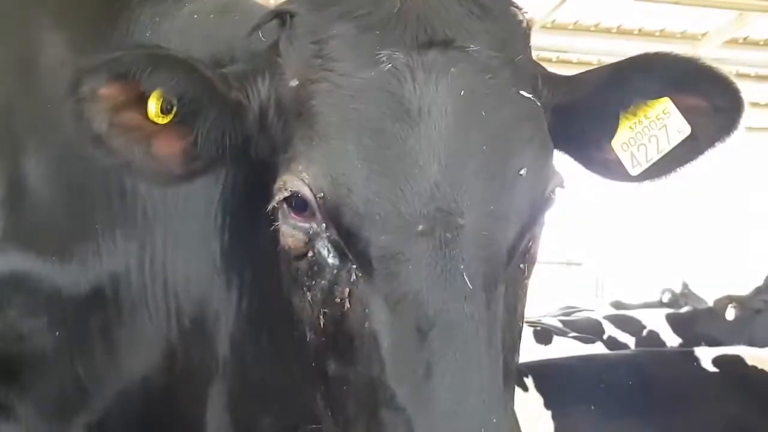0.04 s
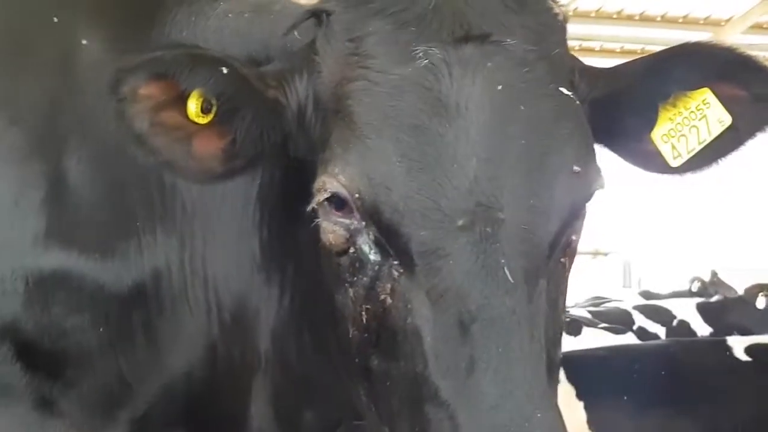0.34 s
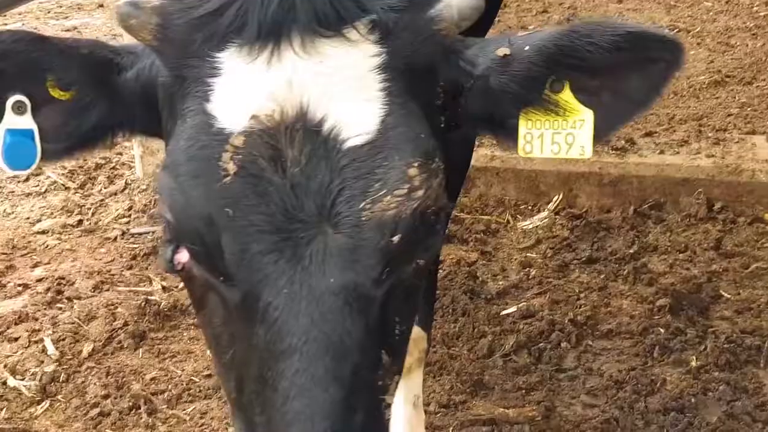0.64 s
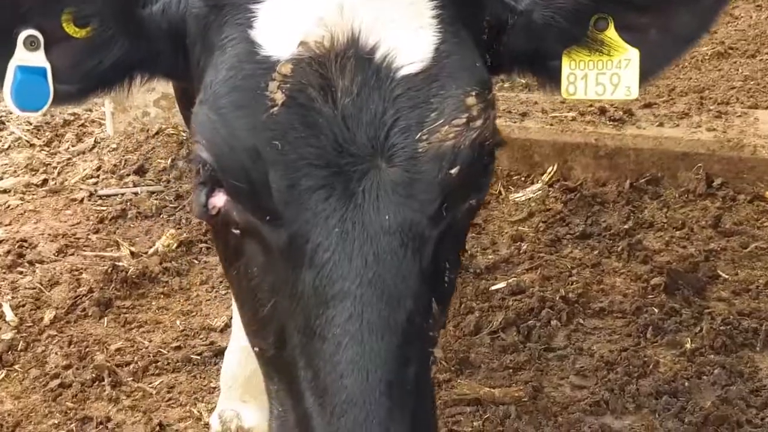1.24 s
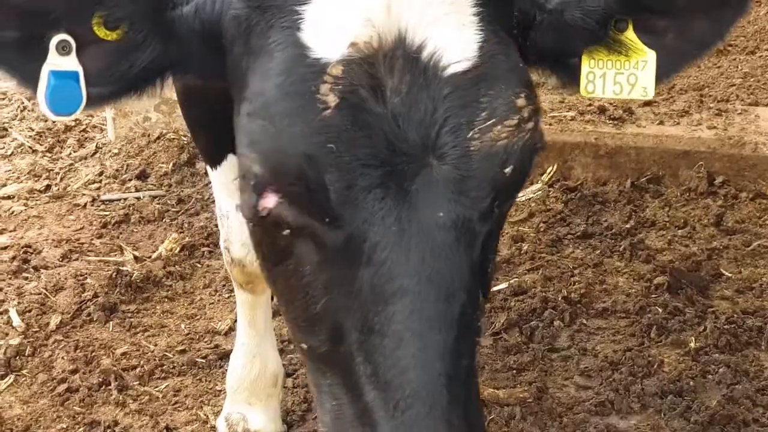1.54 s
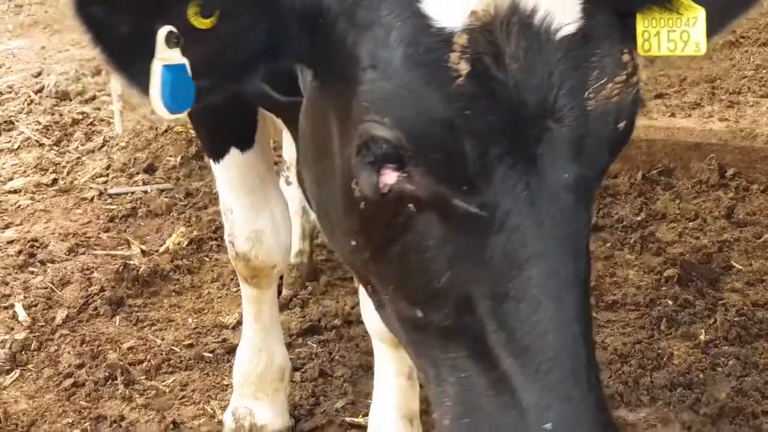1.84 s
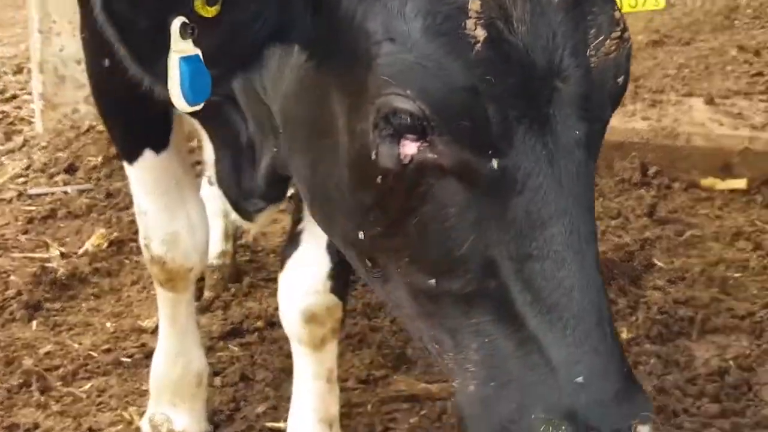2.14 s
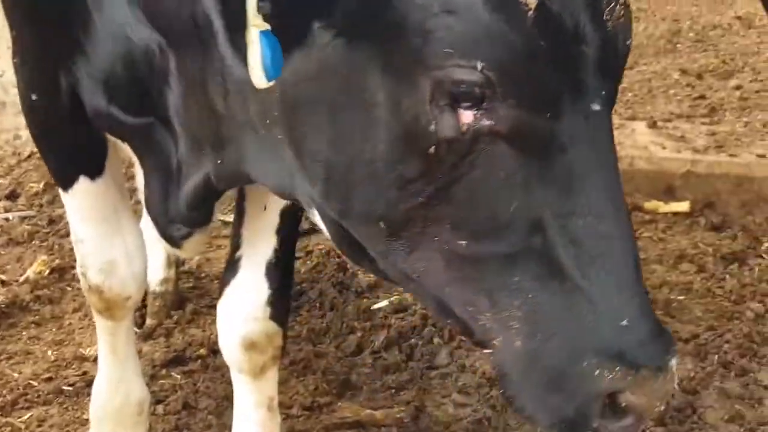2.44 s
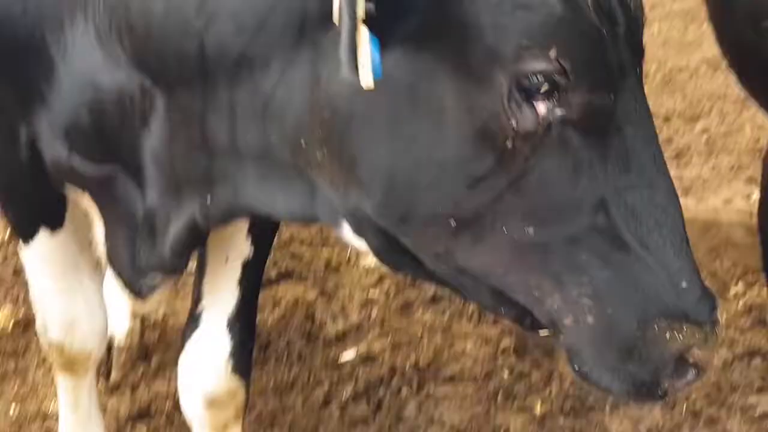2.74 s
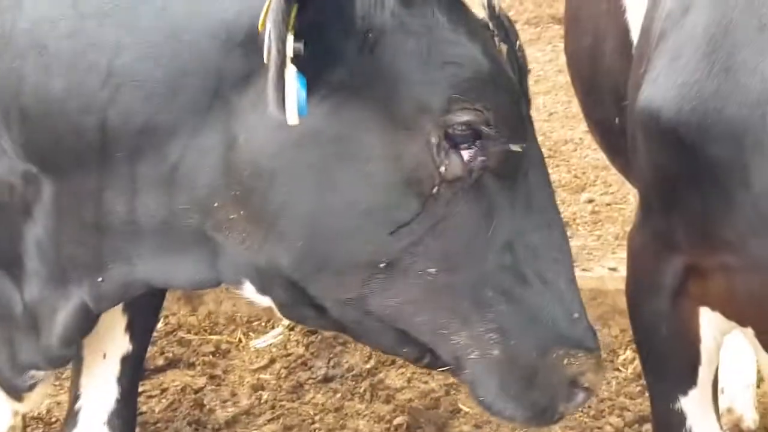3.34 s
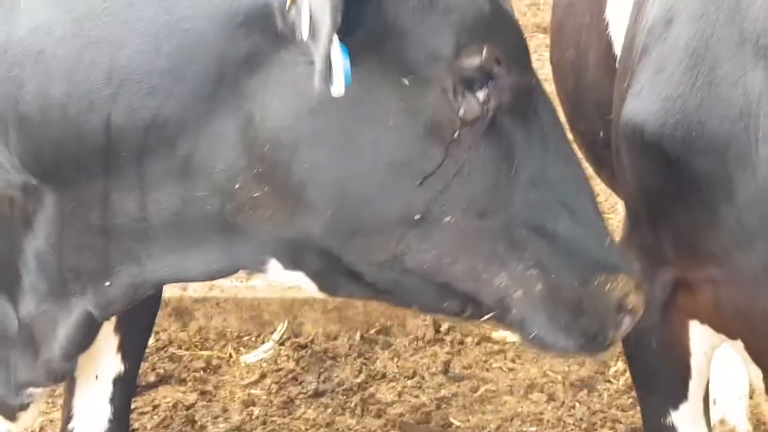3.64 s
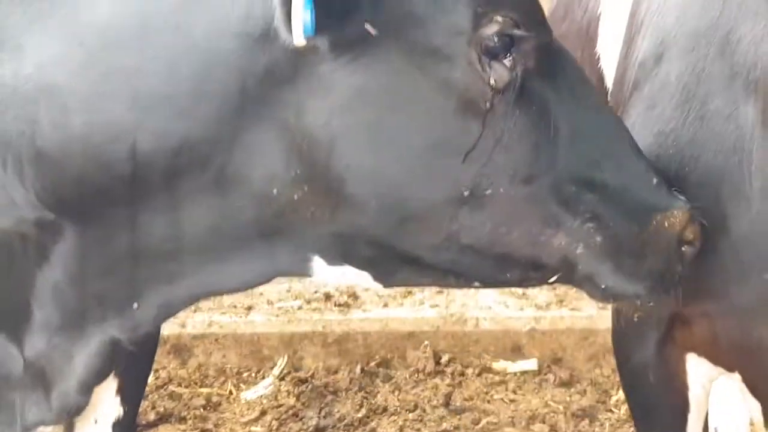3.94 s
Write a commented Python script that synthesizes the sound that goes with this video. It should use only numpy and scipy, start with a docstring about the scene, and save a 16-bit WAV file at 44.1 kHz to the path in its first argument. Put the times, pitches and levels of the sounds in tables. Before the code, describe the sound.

A steady, low machine drone dominates. First, big fans rumble briefly in a dairy barn; then a tick and an abrupt switch bring the droning pump outdoors, with light rushing air, thin whine, faint cattle scuffs and far-off birds.

```python
"""A rumbling rush of air from big fans in a dairy barn, then a cut, with a small click, to the open yard.
There a pump (likely the milking vacuum pump) drones on two low notes, over mains hum and the thin
whine of a motor drive. Outdoor air rushes and a fine hiss sputters on the left. Cattle shift faintly,
small birds chirp far off, and a cow seems to start lowing at the end.
Air, hiss and scuffs are shaped noise; machine tones, chirps and the cow's note are wavering sines."""
import sys
import numpy as np
from scipy import signal
from scipy.fft import rfft, irfft
from scipy.io import wavfile
from scipy.ndimage import uniform_filter1d

SR = 44100
rng = np.random.default_rng(int(sys.argv[2]) if len(sys.argv) > 2 else 0)


def master(y):
    """Save y as 16-bit WAV."""
    cut = np.clip(np.atleast_2d(y).T, -1, 1)
    pcm = np.round(cut * 32767)  # scale
    wavfile.write(sys.argv[1], SR, pcm.astype(np.int16))


N = 176400
TIME_S = np.arange(N) / SR

# Yard air spectrum. Each row: frequency in Hz, relative density in dB.
YARD_SPECTRUM = [(20, -33), (50, -1), (90, -1), (135, 1), (180, -4.5), (330, -9.5), (520, -14.5),
                 (740, -14.5), (1100, -18), (2200, -20.5), (2950, -25.5), (3750, -25), (4020, -23),
                 (4300, -26), (5200, -32.5), (7000, -35), (8500, -40), (12000, -35.5), (15800, -39)]
# Yard air stereo likeness. Each row: frequency in Hz, L/R correlation.
YARD_CORRELATION = [(100, .96), (290, 0.9), (640, 0.0017), (1200, -0.42), (2100, 0.23), (3500, -0.12),
                    (12000, 0.13)]
# Yard air balance. Each row: frequency in Hz, L-R in dB.
YARD_LEAN_DB = [(100, 11.5), (300, -1), (650, 3), (1200, 0.5), (4000, -1), (7000, 0.5), (10000, 3)]
# Yard air swell. Each row: time in seconds, gain in dB.
YARD_SWELL_DB = [(.64, 0), (1.2, -0.9), (2.2, -0.36), (2.7, 0.1), (3.3, 0), (3.9, 0.7)]

# Bird calls. Each row: start and length in seconds, start and end pitch in Hz, peak level in dB.
BIRD_CHIRPS = [(0.558, 0.073, 3830, 3860, -51.5), (0.906, 0.079, 6400, 6430, -59),
               (1.468, 0.057, 5560, 5850, -49.5), (1.585, 0.038, 5400, 5540, -60),
               (3.469, 0.059, 4700, 4550, -53), (3.765, 0.066, 6750, 6700, -56.5),
               (3.783, 0.036, 5300, 5530, -58)]
# Scuffs and bumps. Each row: start and length in seconds, centre in Hz, peak level in dB, L-R in dB.
CATTLE_SCUFFS = [(0.011, 0.089, 61, -30.5, 4), (0.107, 0.13, 480, -39, -3), (0.48, 0.016, 167, -23, -2),
                 (.54, 0.16, 3800, -46.5, -4), (0.537, 0.2, 970, -46, 8), (2.648, 0.066, 243, -38, 5),
                 (3.533, 0.048, 676, -46, 4)]

# Lower hiss band. Each row: frequency in Hz, relative density in dB.
LOW_HISS_SPECTRUM = [(6500, -33), (8400, -6), (9200, -0.5), (10100, -0.5), (10750, 0), (11400, -3),
                     (13000, -23)]
# Lower band envelope. Each row: time in seconds, base level on the left in dB.
LOW_HISS_DB = [(.64, -56), (.95, -60.5), (1.15, -58), (1.95, -57.5), (2.4, -55), (2.85, -56.5), (3.4, -54),
               (3.6, -60), (3.75, -53.5), (4, -52.5)]
# Upper hiss band. Each row: frequency in Hz, relative density in dB.
HIGH_HISS_SPECTRUM = [(9500, -23), (11200, -19), (12400, 1.5), (14500, -2), (15800, 0.5)]
# Upper band envelope. Each row: time in seconds, base level on the left in dB.
HIGH_HISS_DB = [(.64, -54), (.95, -55), (1.3, -52), (1.8, -49.5), (2.3, -52), (2.85, -50), (3.55, -53),
                (3.8, -49), (4, -52)]
# Swells of the lower band. Each row: start and length in seconds, boost in dB.
HISS_RUSTLES = [(2.48, 0.14, 3.8), (2.69, 0.23, 3.2), (2.93, .18, 2.7), (3.2, 0.11, 2.8), (3.33, 0.11, 2.2),
                (3.7, 0.078, 4)]
# Spurts in both bands. Each row: start in seconds, boost in dB.
HISS_SPURTS = [(1.14, 4), (1.277, 4), (1.352, 6), (1.45, 4), (1.715, 5.3), (1.763, 6.1), (2.033, 5),
               (2.715, 3), (2.785, 4), (2.832, 4.5), (3.059, 5)]

# Cow's voice. Each row: harmonic number, level in dB.
MOO_HARMONICS = [(1, -45), (2, -39), (3, -44), (4, -43), (7, -51), (9, -53)]
# Breath in the call. Each row: frequency in Hz, relative density in dB.
MOO_RASP_SPECTRUM = [(60, -12), (200, -2), (400, 0), (800, -6), (1200, -15), (2200, -18), (5000, -36)]

# Motor whine. Each row: multiple of the shaft rate, level before fading in dB, L-R in dB.
MOTOR_ORDERS = [(6, -55, 2), (9, -58, 2), (18, -62, 3), (24, -62, -5), (30, -64, -1), (32, -64, -2)]
# Other machine tones. Each row: frequency in Hz, level before fading in dB, L-R in dB.
MACHINE_WHINES = [(373, -58, 3), (459, -60, 2), (609, -62, 0), (872, -64, -2), (909, -65, 1),
                  (2296, -71, 0)]
# Switching whine of the drive. Each row: sideband number, level before fading in dB.
DRIVE_SIDEBANDS = [(-2, -66.5), (-1, -68.5), (0, -71.5), (1, -67), (2, -68)]

# Fan rush spectrum. Each row: frequency in Hz, relative density in dB.
FAN_SPECTRUM = [(20, -21), (33, -10), (60, 3), (85, 1.5), (110, 3.5), (150, -1), (280, -5), (340, -3),
                (450, -9), (800, -12.5), (1250, -17), (2200, -20), (3900, -24), (6500, -34.5),
                (9800, -42.5), (11500, -37.5), (15800, -45)]
# Fan rush swell. Each row: time in seconds, gain in dB.
FAN_SWELL_DB = [(0, 0), (.08, 1.7), (.17, 2.1), (.27, 0), (.48, 0.8), (.6, 1.5)]
# Barn stereo likeness. Each row: frequency in Hz, L/R correlation.
BARN_CORRELATION = [(100, 0.98), (300, 0.9), (600, 0.42), (1100, -0.45), (2000, 0.17), (4000, -0.038),
                    (12000, .15)]
# Barn balance. Each row: frequency in Hz, L-R in dB.
BARN_LEAN_DB = [(200, 1.1), (800, 1.5), (2000, -.5), (4500, -4), (9000, 0)]
# Fan blade and motor tones. Each row: frequency in Hz, level before fading in dB.
FAN_WHINES = [(75, -42), (161, -42), (235, -45), (333, -43), (480, -53), (640, -55), (1068, -55),
              (1283, -61), (3932, -65)]

# Pump drone. Each row: harmonic number, level at the cut in dB, L-R in dB, left lead in radians.
PUMP_HARMONICS = [(1, -28, 3, .13), (2, -19.5, 2.5, 0.38), (4, -57, -5, 0.35), (6, -70.5, -31, 0.43)]

CUT_S, CUT_FADE_S = .637, .001


def undb(db):
    """Decibels to gain."""
    return 10 ** (np.asarray(db) / 20)


def curve(rows):
    """Interpolate (s, value) rows per sample."""
    return np.interp(TIME_S, *np.array(rows, float).T)


def per_bin(rows):
    """Interpolate (Hz, value) rows per FFT bin, on a log axis."""
    hz, value = np.array(rows, float).T
    bin_hz = np.maximum(np.arange(N // 2 + 1) * SR / N, 1)
    return np.interp(np.log(bin_hz), np.log(hz), value)


def ramp(start_s, length_s):
    """Linear rise from 0 to 1, then held."""
    return np.clip((TIME_S - start_s) / length_s, 0, 1)


def arch(start_s, length_s):
    """Half-sine swell."""
    return np.sin(np.pi * ramp(start_s, length_s))


def wander(rate_hz):
    """Smooth random drift, standard deviation 1."""
    width = max(int(SR / rate_hz), 2)
    drift = rng.standard_normal(N)
    for _ in range(2):
        drift = uniform_filter1d(drift, width, mode="wrap")
    return drift / drift.std()


def pan(lean_db):
    """Constant-power stereo gains; positive leans left."""
    lean_db = np.atleast_1d(lean_db)
    gains = undb(np.array([lean_db, -lean_db]) / 2)
    return gains / np.sqrt(np.mean(gains ** 2, axis=0))


def air(spectrum, correlation=None, lean_db=None):
    """Shaped stereo turbulence, rms 1."""
    mid, side = rfft(rng.standard_normal((2, N)))
    likeness = np.clip(per_bin(correlation), -.99, .99) if correlation else 0
    bins = mid * np.sqrt(1 + likeness) + np.array([[1], [-1]]) * side * np.sqrt(1 - likeness)
    balance = pan(per_bin(lean_db)) if lean_db else 1
    noise = irfft(bins * undb(per_bin(spectrum)) * balance, N)
    return noise / noise.std()


def tone(hz, db, lean_db, lead_rad=0):
    """Stereo sine on a pitch track; the left leads by lead_rad."""
    phase = 2 * np.pi * (np.cumsum(hz * np.ones(N)) / SR + rng.random())
    offset_rad = np.array([[lead_rad], [-lead_rad]]) / 2
    return np.sqrt(2) * undb(db) * pan(lean_db) * np.sin(phase + offset_rad)


def whine(hz, db, lean_db, drift_hz=1.19, fade_db=4):
    """Far tone arriving by many paths, drifting and fading."""
    pitch_hz = hz + drift_hz * wander(3.96)
    level_db = db + fade_db * (wander(2.5) - .5)
    lead_rad = rng.uniform(-2.03, 1) * min(hz / 700, 2)
    return tone(pitch_hz, level_db, lean_db, lead_rad)


def yard_air(base_db=-35.5):
    """Even rush of open air."""
    rush = air(YARD_SPECTRUM, YARD_CORRELATION, YARD_LEAN_DB)
    return rush * undb(base_db + curve(YARD_SWELL_DB) + .35 * wander(8))


def birds(rasp_hz=160):
    """Distant chirps: short glides, roughened by fast pitch jitter."""
    out = 0
    for start_s, length_s, from_hz, to_hz, db in BIRD_CHIRPS:
        glide_hz = from_hz + (to_hz - from_hz) * ramp(start_s, length_s)
        pitch_hz = glide_hz + rasp_hz * wander(900)
        out += arch(start_s, length_s) * tone(pitch_hz, db, lean_db=-2, lead_rad=.62)
    return out


def cattle_scuffs(skirt_octaves=.8):
    """Dull bumps and light rubbing, likely cattle shifting; none carries across the cut."""
    skirt = 2 ** skirt_octaves
    out = 0
    for start_s, length_s, hz, db, lean_db in CATTLE_SCUFFS:
        band = [(hz / skirt ** 2, -60), (hz / skirt, -14), (hz, 0),
                (hz * skirt, -24), (hz * skirt ** 2, -60)]
        same_scene = (TIME_S < CUT_S) == (start_s < CUT_S)
        out += air(band) * pan(lean_db) * undb(db) * arch(start_s, length_s) * same_scene
    return out


def hiss(lean_db=18, sputter_db=2, sputter_hz=100, spurt_decay_s=.015):
    """Two very high noise bands on the left; both spurt, the lower also swells in rustles."""
    spurts_db = sum(db * (TIME_S >= start_s) * np.exp(-np.abs(TIME_S - start_s) / spurt_decay_s)
                    for start_s, db in HISS_SPURTS)
    rustles_db = sum(db * arch(start_s, length_s) for start_s, length_s, db in HISS_RUSTLES)
    shared_db = spurts_db + .96 * wander(sputter_hz)
    out = 0
    for spectrum, level_db in ((LOW_HISS_SPECTRUM, curve(LOW_HISS_DB) + rustles_db),
                               (HIGH_HISS_SPECTRUM, curve(HIGH_HISS_DB))):
        out += air(spectrum) * undb(level_db + shared_db + sputter_db * wander(sputter_hz))
    return out * pan(lean_db) / np.sqrt(2)


def moo(start_s=3.94, attack_s=.05, voice_hz=203, jitter=.06, rasp_db=-38):
    """Rough, airy low note, likely a cow starting to call."""
    pitch_hz = voice_hz * (1 + jitter * wander(400))
    rasp = undb(rasp_db) * air(MOO_RASP_SPECTRUM, BARN_CORRELATION)
    voice = sum(tone(k * pitch_hz, db, lean_db=1) for k, db in MOO_HARMONICS)
    return ramp(start_s, attack_s) * (rasp + voice)


def click(gain_db=-23, decay_s=.0007, lowpass_hz=2600):
    """Short, slightly dull tick at the cut."""
    burst = rng.standard_normal(N) * np.exp(-np.abs(TIME_S - CUT_S) / decay_s)
    return undb(gain_db) * signal.lfilter(*signal.butter(1, lowpass_hz, fs=SR), burst)


def machines(shaft_hz=43.08, switching_hz=4020, spacing_hz=42.2):
    """Thin tones of a motor and other machinery, plus the drive's switching sidebands."""
    motor = sum(whine(k * shaft_hz, db, lean_db) for k, db, lean_db in MOTOR_ORDERS)
    others = sum(whine(hz, db, lean_db) for hz, db, lean_db in MACHINE_WHINES)
    drive = sum(whine(switching_hz + k * spacing_hz, db, lean_db=-4) for k, db in DRIVE_SIDEBANDS)
    return motor + others + drive


def mains_hum(hz=99.9, db=-40):
    """One low electrical tone, wavering slightly in level."""
    return tone(hz, db + .88 * wander(2.4), lean_db=2.2, lead_rad=.2)


def barn_fans(base_db=-31.5, buffet_db=1.1):
    """Buffeting air with unsteady blade and motor tones."""
    rush = air(FAN_SPECTRUM, BARN_CORRELATION, BARN_LEAN_DB)
    rush *= undb(base_db + curve(FAN_SWELL_DB) + buffet_db * wander(25))
    return rush + sum(whine(hz, db, lean_db=1, drift_hz=4.86) for hz, db in FAN_WHINES)


def pump(fundamental_hz=65.29, speed_drift=.00098, flutter_db=.21, sag_db_per_s=.4):
    """Steady drone, strongest on harmonic 2, slowly sinking in level."""
    pitch_hz = fundamental_hz * (1 + speed_drift * wander(5.4))
    sag_db = sag_db_per_s * (TIME_S - CUT_S)
    return sum(tone(k * pitch_hz, db - sag_db + flutter_db * wander(7), lean_db, lead_rad)
               for k, db, lean_db, lead_rad in PUMP_HARMONICS)


def scene():
    """The barn, then a hard cut with a click to the yard."""
    yard = pump() + mains_hum() + machines() + yard_air() + hiss() + moo()
    outside = ramp(CUT_S - CUT_FADE_S / 2, CUT_FADE_S)
    return (1 - outside) * barn_fans() + outside * yard + click() + birds() + cattle_scuffs()


def record(dry):
    """Steep elliptic low-pass on the top treble."""
    cutoff_hz = 15850
    return signal.sosfilt(signal.ellip(12, .1, 80, cutoff_hz, fs=SR, output="sos"), dry)


dry = scene()
out = record(dry)
master(out)
```